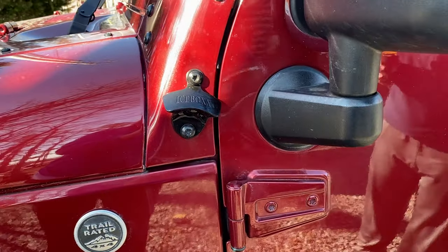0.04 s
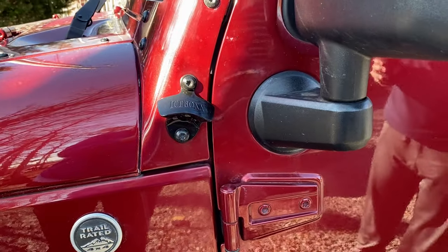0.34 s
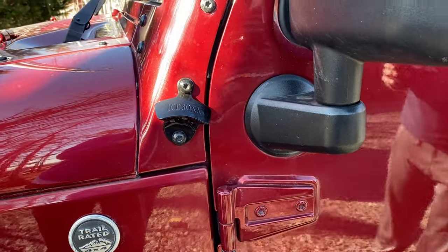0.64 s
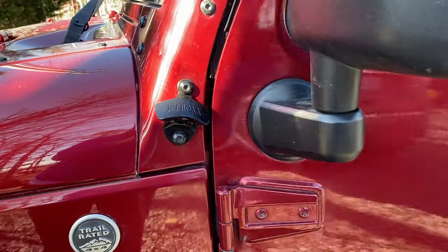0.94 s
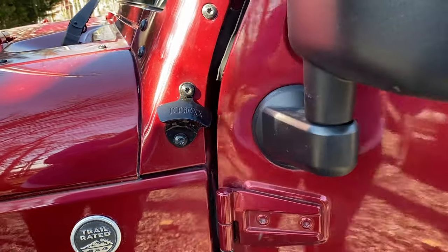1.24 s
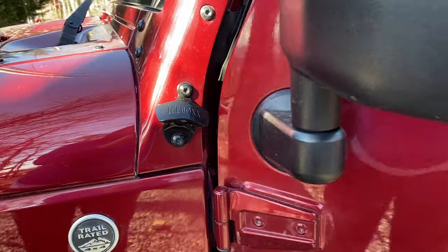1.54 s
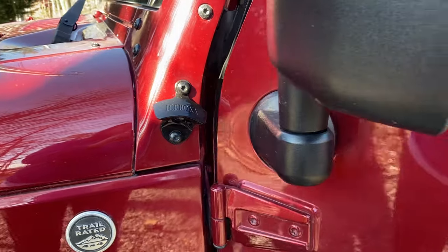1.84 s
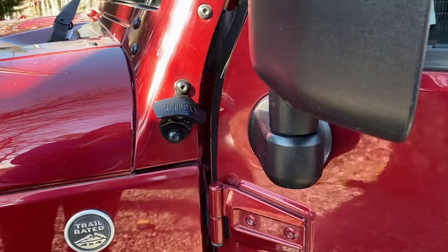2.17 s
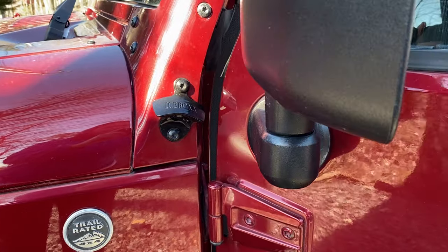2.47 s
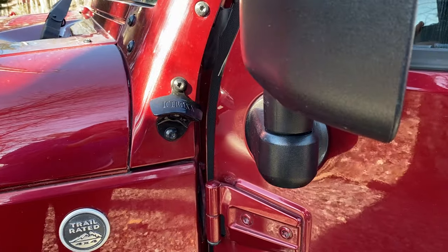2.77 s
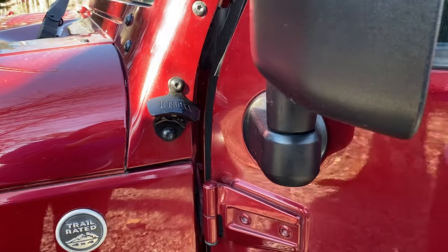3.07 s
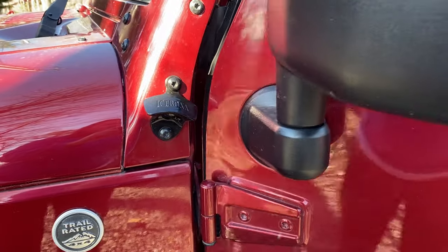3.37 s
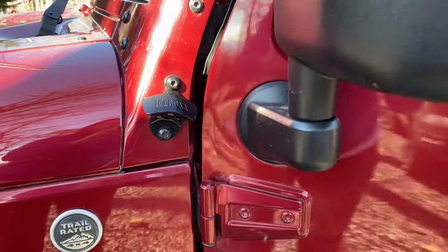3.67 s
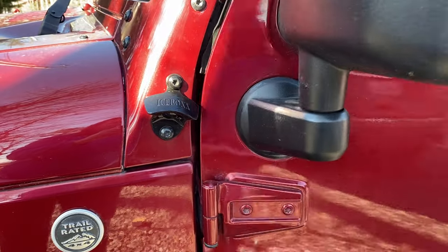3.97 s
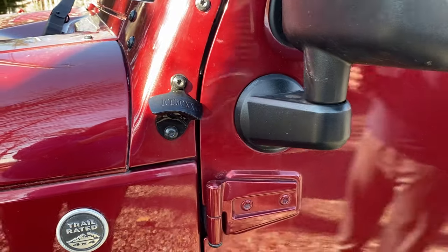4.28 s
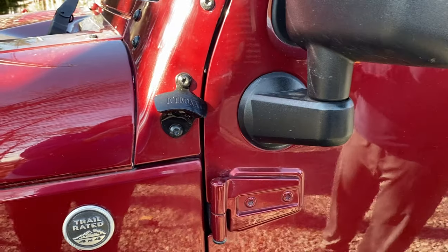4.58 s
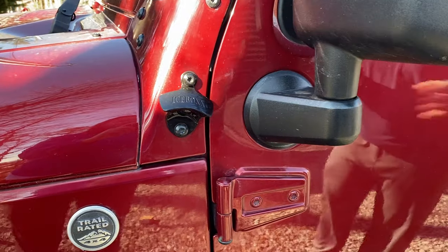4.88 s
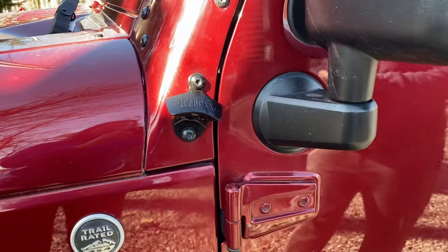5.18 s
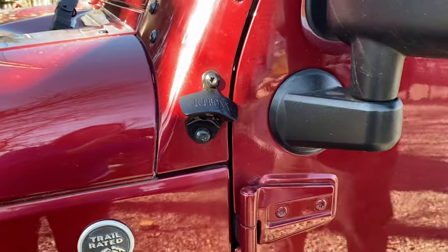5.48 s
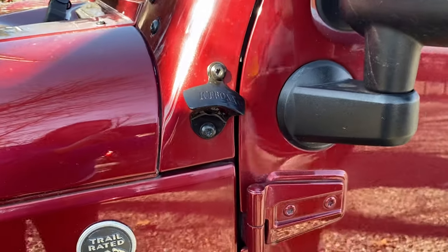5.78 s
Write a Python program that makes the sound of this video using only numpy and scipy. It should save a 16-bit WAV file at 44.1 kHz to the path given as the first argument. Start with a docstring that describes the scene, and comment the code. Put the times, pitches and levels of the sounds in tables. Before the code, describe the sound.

Soft outdoor air rumbles throughout, and at first shoes scuff on gravel with a couple of stone clicks. At about 0.5 seconds, close and slightly to the right, a car's steel door unlatches with a sharp crack, a short panel ring and a low thump. Lighter knocks, brief hollow rubs and scuffs follow until about 1 second. It then grows quiet, with only faint shuffles and pebble ticks. From roughly 2.7 to 4.2 seconds a far engine hums one low, wavering note that sinks slightly. At 4.4 seconds the door slams, by far the loudest sound: the latch cracks, the panels ring and the body booms, dying away within about half a second. From around 5.3 seconds to the end at 6, footsteps crunch on the gravel with soft thuds, and single stones click brightly together.

```python
"""Outdoors on gravel, air rumbles softly and shoes scuff and thud. Half a second in, the steel door of an
off-road car is unlatched and swung open: the latch cracks and the panels ring. A far engine drones for
a while. At 4.4 seconds the door is slammed, so the panels ring loudly and the car's body booms.
Last, the shoes crunch the gravel again and single stones click together."""
import sys
import numpy as np
from scipy import signal
from scipy.fft import rfft, irfft, next_fast_len
from scipy.io import wavfile

SR = 44100
rng = np.random.default_rng(int(sys.argv[2]) if len(sys.argv) > 2 else 0)


def output_pcm(signal):
    """Save a mono or channel-first signal as 16-bit PCM at the path in sys.argv[1].

    Samples are clipped to [-1, 1] before scaling.
    """
    pcm = np.clip(np.atleast_2d(signal).T, -1, 1) * 32767
    wavfile.write(sys.argv[1], SR, np.round(pcm).astype(np.int16))


N = 265482
TIME = np.arange(N) / SR
FFT_SIZE = next_fast_len(N + 4096)
BIN_HZ = np.maximum(np.arange(FFT_SIZE // 2 + 1) * SR / FFT_SIZE, 1)

# metal meets metal in the door: start_s, crack_db, panel_db
DOOR_CONTACTS = [(0.4490, -22, -28), (0.4545, -50, -27), (0.475, -34, -33.5), (0.486, -59, -42),
                 (0.4946, -45, -41.5), (0.5234, -48, -42.5), (0.6456, -47, -44), (0.6843, -33.5, -46),
                 (0.713, -36, -37), (0.75, -39.5, -37.5), (0.8628, -32, -42.5), (0.8751, -38, -41.5),
                 (1.061, -44.5, -46), (1.565, -46, -57.5), (4.3677, -24.5, -24.5), (4.3736, -38, -23),
                 (4.386, -12.5, -8.5), (4.392, -37.5, -25.5), (4.3998, -20, -26.5), (4.4122, -24, -28),
                 (4.433, -61, -27.5)]
# the bright tone of gravel: pitch_hz, level_db
GRAVEL_TONE = [(900, -11), (2000, -1), (3500, 0.5), (5500, -3), (8000, -3.5), (10000, -5.5), (14000, -7),
               (16000, -16)]
# the deep tone of moving air, footfalls and shuddering parts: pitch_hz, level_db
RUMBLE_TONE = [(12, -46.5), (20, -11), (44, 2.5), (70, 7), (98, 1), (150, -6), (400, -32.5), (520, -86.5),
               (880, -120)]


def from_db(db):
    """Turn decibels into a number to multiply by."""
    return 10 ** (np.asarray(db) / 20)


def unit_power(x):
    """Scale a signal to an average power of 1."""
    return x / np.sqrt(np.mean(x ** 2) + 1e-20)


def over_time(rows):
    """Join a table's moments into lines, with a value for every sample."""
    times, *columns = np.transpose(rows)
    return [np.interp(TIME, times, column) for column in columns]


def over_pitch(points):
    """Join a table's pitches into a line, with a value for every frequency."""
    hz, value = np.transpose(points)
    return np.interp(np.log(BIN_HZ), np.log(hz), value)


def drift(per_s):
    """Wander at random, typically by 1 either way."""
    turns = rng.standard_normal(4000)
    return unit_power(np.interp(TIME * per_s, np.arange(len(turns)), turns))


def swell(peak_s, length_s):
    """One smooth rise and fall."""
    return np.cos(np.pi * np.clip((TIME - peak_s) / length_s, -.5, .5))


def coloured(tone, source, diffuse=0):
    """Give two noises a tone and blend them into stereo; more diffuse sounds wider."""
    # how alike left and right are: pitch_hz, likeness (1 = the same)
    likeness = [(60, 0.57), (300, 0.89), (700, 0.57), (1400, -0.1), (3000, 0.27), (14000, 0.89)]
    bass_cut = np.minimum(BIN_HZ / tone[0][0], 1) ** 2
    treble_cut = np.minimum(tone[-1][0] / BIN_HZ, 1) ** 2
    mid, side = rfft(source, FFT_SIZE) * from_db(over_pitch(tone)) * bass_cut * treble_cut
    alike = np.clip(over_pitch(likeness), 0, .995) ** (1 + diffuse)
    pair = np.sqrt(1 + alike) * mid + np.sqrt(1 - alike) * np.array([side, -side])
    return unit_power(irfft(pair, FFT_SIZE)[:, :N])


def noise(tone, diffuse=0):
    """Smooth stereo noise with the given tone."""
    return coloured(tone, rng.standard_normal((2, N)), diffuse)


def grains(per_s, spread_db):
    """Random stereo ticks of uneven size."""
    happens = rng.random(N) < per_s / SR
    sizes = from_db(spread_db * np.minimum(rng.exponential(1, N), 4))
    return unit_power(happens * sizes * rng.standard_normal((2, N)))


def clicks(times, levels_db):
    """One sharp spike for each event."""
    return np.bincount(np.round(times * SR).astype(int), from_db(levels_db), N)[:N] + 1e-18


def fade(hits, fade_s):
    """A level that jumps at each hit, then falls 60 dB in fade_s."""
    return signal.lfilter([1], [1, -from_db(-60 / (fade_s * SR))], hits)


def ring(force, hz, fade_s):
    """Each push starts a pure note that dies away."""
    decay, angle = from_db(-60 / (fade_s * SR)), 2 * np.pi * hz / SR
    return signal.lfilter([0, decay * np.sin(angle)], [1, -2 * decay * np.cos(angle), decay ** 2], force)


def boost_band(x, hz, width_hz, gain_db):
    """Turn one band of pitches up, or down if the gain is negative."""
    return x + (from_db(gain_db) - 1) * signal.lfilter(*signal.iirpeak(hz, hz / width_hz, fs=SR), x)


def flicker(x, depth_db, per_s):
    """Each band of pitches flickers on its own, as with rough surfaces."""
    out, rest = 0, x
    for hz in np.geomspace(700, 11200, 7):
        band = signal.sosfiltfilt(signal.butter(2, hz, fs=SR, output="sos"), rest)
        out = out + band * from_db(depth_db * drift(per_s))
        rest = rest - band
    return unit_power(out + rest * from_db(depth_db * drift(per_s)))


def air_and_thuds(hush_db=-64.5):
    """Footfalls thud softly over the rumble of moving air and a faint even hush."""
    # the rumble's strength: time_s, level_db
    strength = [(0.0, -45.5), (0.3, -50), (0.6, -39.5), (0.85, -47.5), (1.48, -55.5), (1.75, -51.5),
                (2.65, -61), (3.55, -56), (4.18, -53.5), (4.35, -32), (5.0, -39), (5.3, -45), (6.02, -46.5)]
    # soft, low thuds of footfalls: peak_s, length_s, level_db
    thuds = [(0.197, 0.058, -46), (3.19, 0.12, -51.5), (3.742, 0.12, -53.5), (5.431, 0.2, -38.5),
             (5.929, 0.11, -39.5)]
    # the outdoor hush: pitch_hz, level_db
    hush_tone = [(88, -47), (150, -4.5), (259, -11.5), (514, -14), (759, -20), (1340, -22.5), (2870, -40),
                 (8070, -58.5), (10400, -67), (14000, -72), (16000, -78)]
    level = from_db(over_time(strength)[0])
    for peak_s, length_s, db in thuds:
        level = np.hypot(level, from_db(db) * swell(peak_s, length_s))   # hypot adds their powers
    return from_db(-0.5) * level * noise(RUMBLE_TONE) + from_db(hush_db) * noise(hush_tone)


def far_engine(waver_hz=9, throb_db=1.5):
    """A far engine fires so fast that it hums one low, wavering note."""
    # the drone's course: time_s, pitch_hz, level_db
    drone = [(2.3, 136, -68.5), (2.75, 141.7, -63.5), (2.95, 138.2, -53.5), (3.2, 133.4, -50.5),
             (3.5, 131, -58.5), (4.0, 127, -57), (4.3, 126, -78)]
    pitch_hz, level_db = over_time(drone)
    phase = 2 * np.pi * np.cumsum(pitch_hz + waver_hz * drift(per_s=54)) / SR
    level = from_db(level_db - 1 - throb_db * drift(per_s=13))
    return level * np.sqrt(2) * np.sin(phase)


def pebbles(per_s=1300, ring_cycles=31):
    """Small stones of every size tick, each size at its own pitch."""
    pitches = np.geomspace(1816, 15550, num=18)
    out = 0
    for hz in pitches:
        knocks = grains(per_s / len(pitches), spread_db=2.5) + 1e-18
        out += ring(knocks, hz, ring_cycles / hz) * hz
    return unit_power(out)


def slips(per_s=49, fade_s=0.035):
    """Gravel gives way in small slips: a steady level with brief random surges."""
    sizes = (rng.random(N) < per_s / SR) * rng.uniform(.5, 1, N)
    return unit_power(1 + from_db(6) * fade(sizes + 1e-18, fade_s))


def press(start_s, length_s, rise_s=0.0054, fade_s=0.055):
    """The weight on a sole builds quickly, holds while it slides and lets go."""
    rise = np.clip(1 + (TIME - start_s) / rise_s, 0, 1)
    return rise * from_db(-60 * np.clip((TIME - start_s - length_s) / fade_s, 0, 3))


def footsteps(fidget_db=1.5, clump_db=1.36):
    """Soles grind the gravel in clumps: dull scuffs below, grit, pebbles and rustling cloth above."""
    # a sole presses and slides: start_s, length_s, scuff_db, crunch_db
    steps = [(0.168, 0.0077, -53.5, -56), (0.231, 0.0067, -47, -58.5), (0.313, 0.12, -49.5, -68),
             (0.706, 0.028, -37, -75), (0.79, 0.045, -49.5, -59), (0.879, 0.019, -40.5, -50),
             (1.337, 0.037, -55.5, -62.5), (1.564, 0.02, -53, -57.5), (1.842, 0.0053, -60, -65),
             (2.23, 0.036, -58.5, -69), (3.024, 0.051, -66, -76.5), (3.844, 0.0069, -63, -65.5),
             (4.024, 0.12, -65.5, -64), (4.249, 0.13, -49.5, -63), (4.679, 0.053, -56.5, -63),
             (5.011, 0.032, -52.5, -56), (5.374, 0.16, -49.5, -49), (5.632, 0.089, -46.5, -38.5)]
    # cloth and grit stir as the walker moves: time_s, level_db
    movement = [(0.0, -64.5), (0.4, -68.5), (0.57, -76), (0.67, -58), (1.04, -64), (1.15, -68.5),
                (1.95, -76.5), (2.6, -83.5), (3.47, -86), (3.8, -70), (4.15, -73.5), (4.6, -73),
                (4.97, -66.5), (5.24, -59.5), (5.33, -51), (5.6, -49.5), (5.84, -56), (6.02, -56.5)]
    # a sole's dull scuff: pitch_hz, level_db
    scuff_tone = [(120, 5.5), (200, 9), (315, 4.5), (468, -2), (515, 3.5), (802, 3), (1150, 0), (1510, -3),
                  (1750, -6.5), (3500, -21.5), (4550, -25), (7700, -120)]
    stir = from_db(over_time(movement)[0] + fidget_db * drift(per_s=22))
    scuff_level, crunch_level = stir * from_db(2), stir * from_db(1.5)
    for start_s, length_s, scuff_db, crunch_db in steps:
        weight = press(start_s, length_s)
        scuff_level = np.hypot(scuff_level, from_db(scuff_db) * weight)
        crunch_level = np.hypot(crunch_level, from_db(crunch_db) * weight)
    scuff = coloured(scuff_tone, grains(per_s=2100, spread_db=2.5), diffuse=1.79)
    grit = grains(per_s=2500, spread_db=2) + rng.standard_normal((2, N)) + 0.88 * pebbles()
    crunch = coloured(GRAVEL_TONE, grit, diffuse=2.1) * slips()
    layers = [(scuff, scuff_level * from_db(-1)), (crunch, crunch_level * from_db(1))]
    clumps = unit_power(from_db(clump_db * drift(per_s=130)))
    return clumps * sum(level * flicker(sound, depth_db=0.5, per_s=46) for sound, level in layers)


def stones(snap_s=0.014, tail_s=0.12, tail_db=-20):
    """A knocked stone gives a short bright snap; its size sets the rough pitch."""
    # stones click together: start_s, level_db, pitch_hz
    knocks = [(0.087, -37.5, 4300), (0.3396, -38.5, 3430), (1.352, -47, 5000), (1.8382, -46.5, 5150),
              (2.257, -62, 5800), (2.3665, -51, 8080), (2.929, -65, 10000), (3.285, -61, 9000),
              (3.945, -53.5, 10500), (4.17, -53.5, 9700), (5.25, -44, 6300), (5.4576, -30.5, 3580),
              (5.644, -39, 2500), (5.657, -28, 9600), (5.746, -33.5, 8400), (5.7748, -23.5, 6400),
              (5.8, -31, 4070), (5.8797, -30, 7600), (5.886, -29, 2330), (5.8926, -30, 2250),
              (5.9179, -32, 2200), (5.9226, -33.5, 2900), (6.0160, -38, 2570)]
    out, grit = np.zeros((2, N)), noise(GRAVEL_TONE)
    for start_s, db, hz in knocks:
        first = round(start_s * SR)
        part = slice(first, first + SR // 10)
        snap = unit_power(boost_band(grit[:, part], hz, width_hz=0.39 * hz, gain_db=11))
        hit = signal.unit_impulse(snap.shape[1])
        out[:, part] += from_db(db) * snap * (fade(hit, snap_s) + from_db(tail_db) * fade(hit, tail_s))
    return out


def rubs():
    """Soles and the door seal rub briefly, each rub sounding one hollow note."""
    # short rubs: peak_s, length_s, level_db, pitch_hz
    strokes = [(0.384, 0.055, -54, 880), (0.642, 0.06, -49, 355), (0.725, 0.085, -45, 820),
               (0.749, 0.011, -29, 480), (1.083, 0.057, -50.5, 444), (4.365, 0.065, -39.5, 640),
               (5.333, 0.012, -50, 920), (5.372, 0.075, -43, 1430), (5.462, 0.11, -43, 1390),
               (5.468, 0.046, -42.5, 750), (5.519, 0.012, -37, 760), (5.655, 0.039, -42.5, 990),
               (5.679, 0.016, -39.5, 980), (5.717, 0.013, -41.5, 657)]
    out, friction = np.zeros(N), grains(per_s=1700, spread_db=4)[0]
    for peak_s, length_s, db, hz in strokes:
        part = np.abs(TIME - peak_s) < length_s / 2
        band = signal.iirpeak(hz, Q=2.5, fs=SR)
        hollow = signal.lfilter(*band, signal.lfilter(*band, friction))[part]
        out[part] += from_db(db) * unit_power(hollow) * swell(peak_s, length_s)[part]
    return out


def latch(rise_s=0.0021, snap_s=0.012, rattle_s=0.065, echo_s=0.27, echo_db=-44):
    """Each contact cracks, the lock parts rattle briefly and the surroundings answer faintly."""
    # the latch's bright crack: pitch_hz, level_db
    crack_tone = [(400, -3), (1200, 9), (2000, 2), (2700, 1.5), (3700, -1), (6000, -2), (8000, -6),
                  (10000, -7.5), (14000, -16), (16000, -22)]
    start_s, crack_db, _ = np.transpose(DOOR_CONTACTS)
    hits = clicks(start_s, crack_db)
    rattle_db = crack_db - 1 + 0.18 * (crack_db - crack_db.max())   # light touches rattle less
    rattle = fade(clicks(start_s, rattle_db), rattle_s)
    level = fade(hits, snap_s) + rattle + from_db(echo_db) * fade(hits, echo_s)
    lag = np.exp(-1 / (rise_s * SR))
    level = signal.lfilter([1 - lag], [1, -lag], level)   # each contact takes a moment to build
    crack = flicker(noise(crack_tone, diffuse=-0.043), depth_db=6, per_s=240)
    return from_db(-2.5) * level * crack


def body_boom(shudder_db=-23, shudder_s=0.53, lowest_hz=42):
    """Soft pushes rock the car's body; longer pushes sound deeper. Loose parts shudder on."""
    # the door's weight shoves latch, seal and body: peak_s, level_db, length_s
    shoves = [(0.45, -32, 0.002), (0.4610, -22, 0.0055), (0.5109, -30.5, 0.01), (0.516, -28, 0.0037),
              (0.526, -33, 0.004), (0.831, -41, 0.00077), (4.374, -31, 0.0041), (4.3881, -16, 0.0061),
              (4.4092, -12.5, 0.0033), (4.42, -10, 0.0047), (4.575, -37.5, 0.0033), (4.636, -29.5, 0.0072)]
    # notes of the body and the air inside: pitch_hz, level_db, fade_s
    body_notes = [(48.9, 4.5, 0.24), (57.5, -6, 0.4), (83.1, -5, 0.11), (108.4, -3, 0.28), (120.4, 3, 0.13),
                  (150.3, -8, 0.32), (205.7, -16, 0.63)]
    force = np.full(N, 1e-18)
    for peak_s, db, length_s in shoves:
        push = swell(peak_s, length_s) ** 2
        force += from_db(db) * push / push.sum()
    times, levels_db, _ = np.transpose(shoves)
    shudder = from_db(shudder_db) * fade(clicks(times, levels_db), shudder_s) * noise(RUMBLE_TONE)
    motion = shudder + sum(from_db(db) * ring(force, hz, fade_s) for hz, db, fade_s in body_notes)
    # very slow motion moves air around the door without making sound
    return signal.sosfilt(signal.butter(4, lowest_hz, "high", fs=SR, output="sos"), motion)


def door_panels(notes_db=-4, clatter_db=-9, clatter_s=0.16, tail_db=-25, tail_s=0.39, uneven_db=2.75):
    """The struck steel rings with a few strong notes over a clatter of weak, short ones."""
    # notes of the door's skin and frame: pitch_hz, level_db, fade_s
    panel_notes = [(243.7, 2.5, 0.15), (289.3, -6.5, 0.36), (364, -19.5, 0.6), (398, -2.5, 0.11),
                   (462.3, -4.5, 0.26), (484, -25, 0.36), (567, -13, 0.218), (626, 4, 0.085),
                   (723, -10, 0.14), (797, -9.5, 0.056), (991, -3, 0.08), (1067, -6, 0.043),
                   (1310, -7.5, 0.04), (1384, -2.5, 0.05), (1860, -26, 0.081), (1964, -17, 0.087),
                   (2180, -40, .06), (3600, -13, 0.059), (5400, -14.5, 0.058)]
    # the many weak notes, blurred into noise: pitch_hz, level_db
    clatter_tone = [(100, -29), (200, 12), (450, 2), (650, -1.5), (1100, -11), (1500, -16.5), (1900, -18.5),
                    (3000, -23), (6000, -45)]
    start_s, _, panel_db = np.transpose(DOOR_CONTACTS)
    strike_db = panel_db[:, None] + uneven_db * rng.standard_normal((len(start_s), len(panel_notes)))
    notes = 0
    for k, (hz, db, fade_s) in enumerate(panel_notes):
        strikes = clicks(start_s, strike_db[:, k] + db)
        notes += (-1) ** k * ring(strikes, hz, fade_s)   # neighbouring notes start opposite ways
    hits = clicks(start_s, panel_db)
    clatter_level = from_db(clatter_db) * fade(hits, clatter_s) + from_db(tail_db) * fade(hits, tail_s)
    return from_db(notes_db) * notes + clatter_level * noise(clatter_tone)


def from_right(x):
    """Sound from the right reaches the left side later and, at most pitches, weaker."""
    # how much louder the left is: pitch_hz, difference_db
    balance = [(60, -3.1), (200, 0), (400, -1), (700, -2), (1300, -1.5), (2400, 2.5), (4400, 1.7),
               (9000, -0.6)]
    # how late the left is: pitch_hz, delay_s
    left_lag = [(200, 0.00013), (1200, 0.00015), (2240, 0.000044), (3500, 0.00024), (5000, 0.0002),
                (14000, 0.00016)]
    left_gain = from_db(over_pitch(balance) / 2)
    delay = np.exp(-2j * np.pi * BIN_HZ * over_pitch(left_lag))
    sides = np.array([left_gain * delay, 1 / left_gain])
    return irfft(rfft(x, FFT_SIZE) * sides, FFT_SIZE)[:, :N]


def scene():
    """The door and the scuffing feet are to the right; the background is all around."""
    near = door_panels() + body_boom() + rubs() + latch() + stones() + footsteps()
    background = far_engine() + air_and_thuds()
    return from_right(near) + background * from_db([[-.5], [.5]])


def record(dry):
    """The microphone drops the deepest bass, colours the treble, rounds peaks and cuts the very top."""
    x = signal.sosfilt(signal.butter(2, 33, "high", fs=SR, output="sos"), dry)
    x = boost_band(x, hz=9830, width_hz=980, gain_db=8.5)
    x = boost_band(x, hz=14100, width_hz=2200, gain_db=5)
    x = boost_band(x, hz=12150, width_hz=1300, gain_db=-30)
    rounded = x / (1 + (x / .95) ** 4) ** .25
    return signal.sosfilt(signal.cheby2(16, 80, 16900, fs=SR, output="sos"), rounded)


dry = scene()
out = record(dry)
output_pcm(out)
```